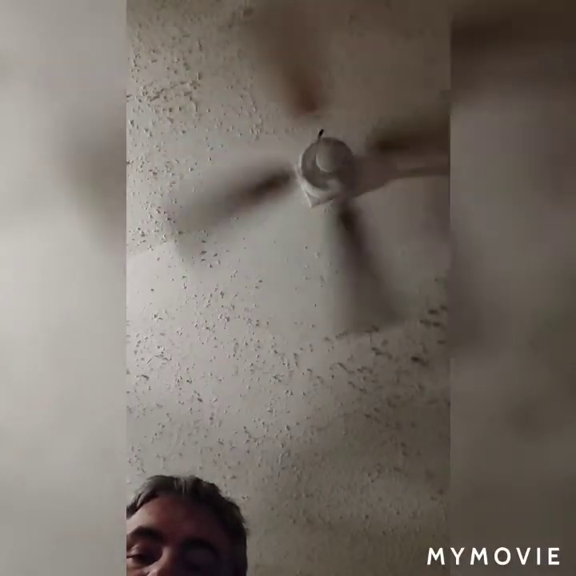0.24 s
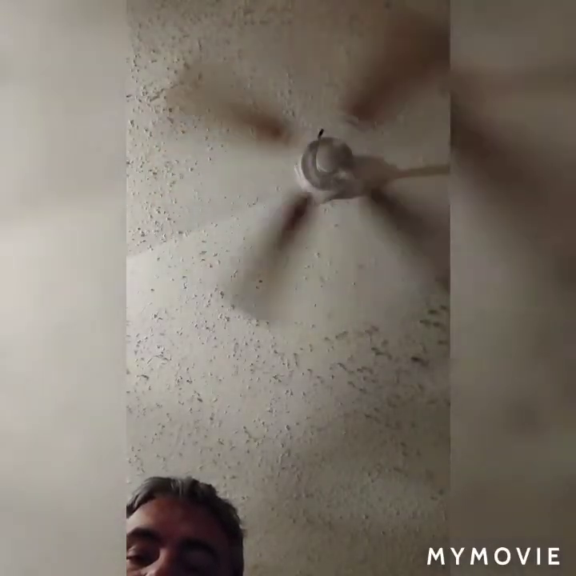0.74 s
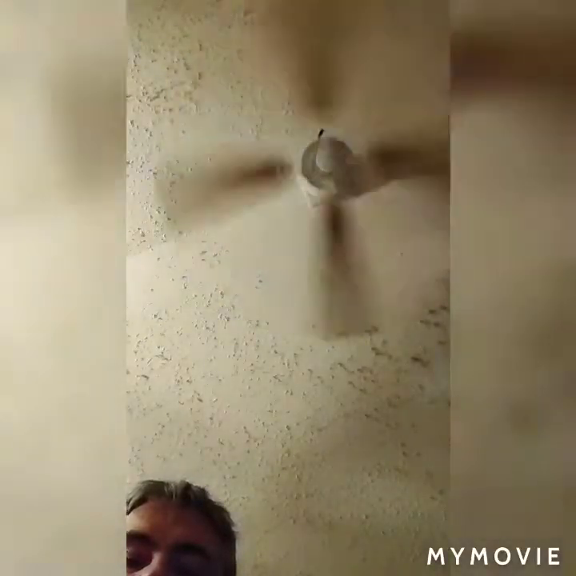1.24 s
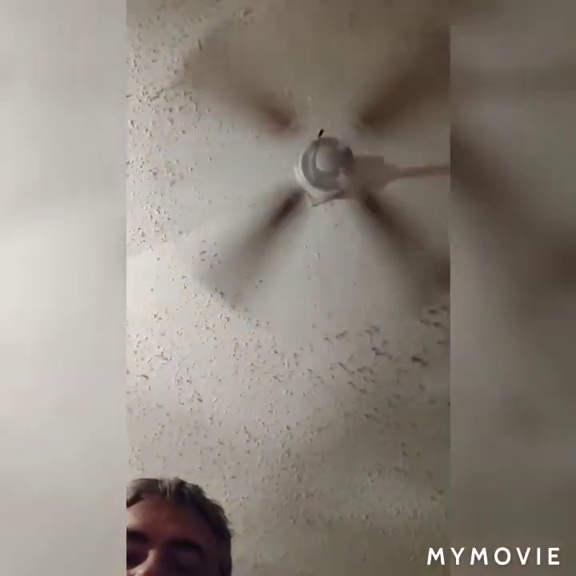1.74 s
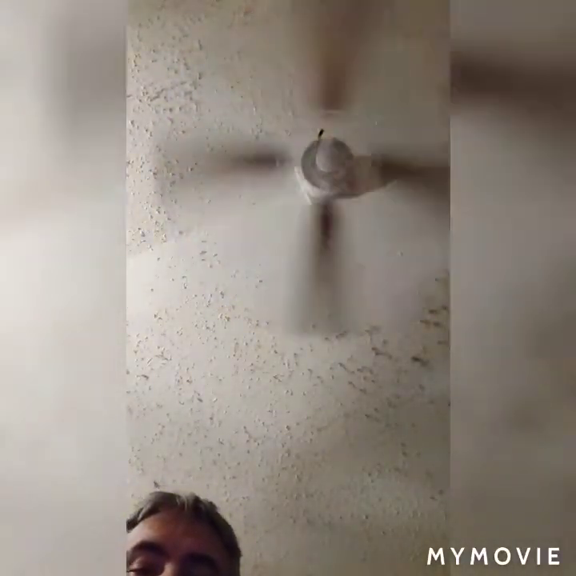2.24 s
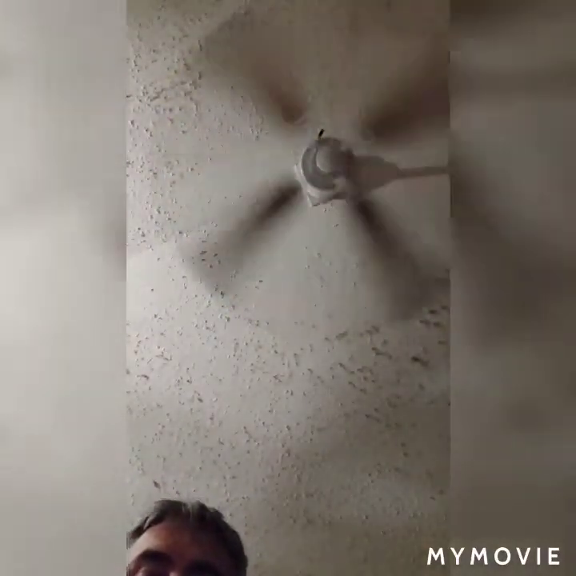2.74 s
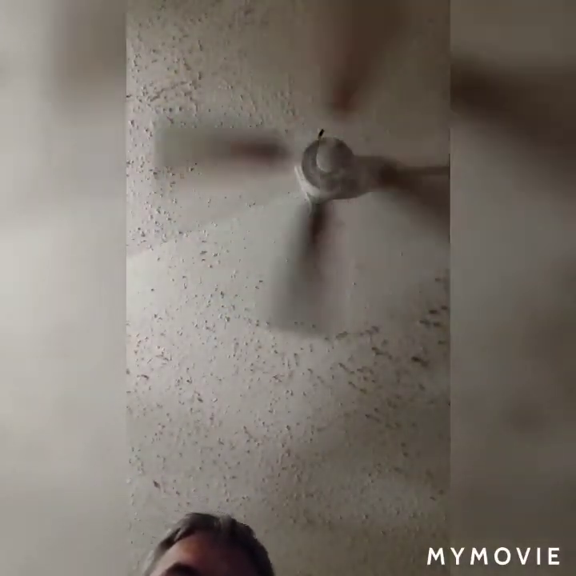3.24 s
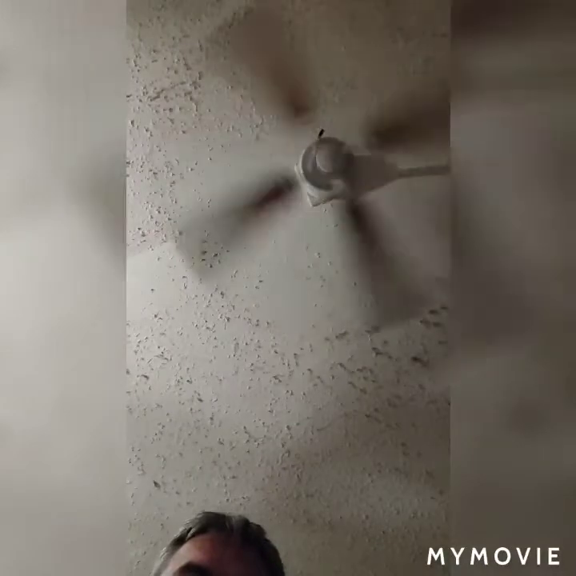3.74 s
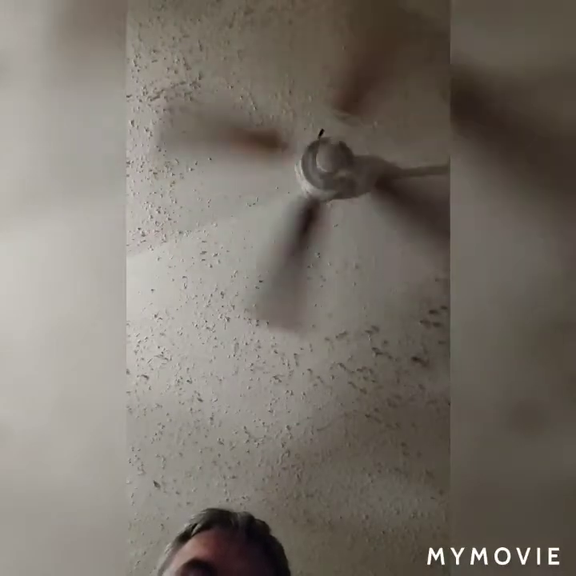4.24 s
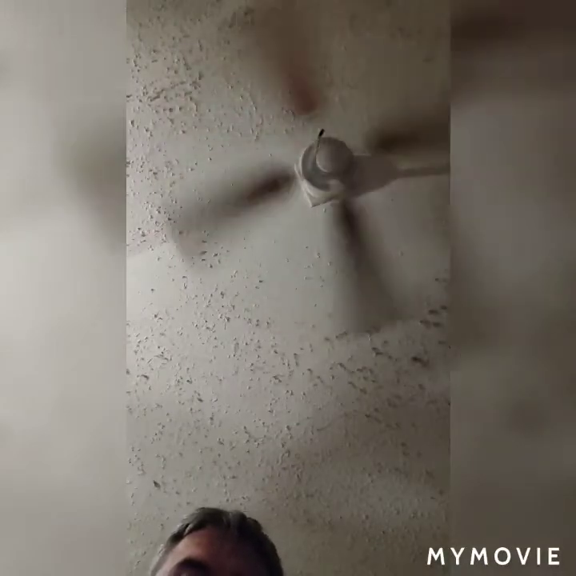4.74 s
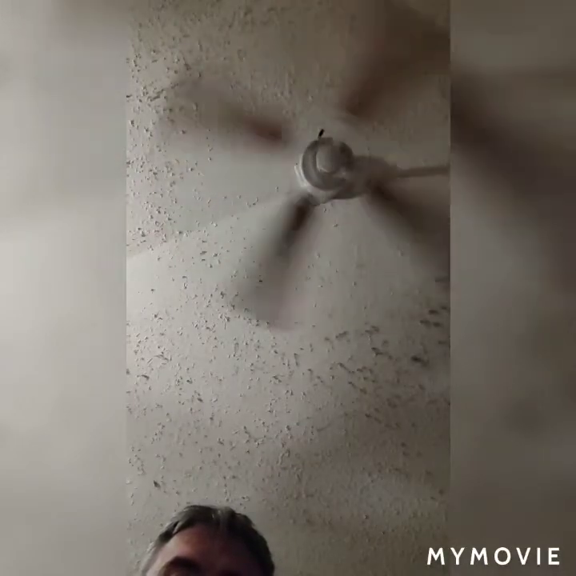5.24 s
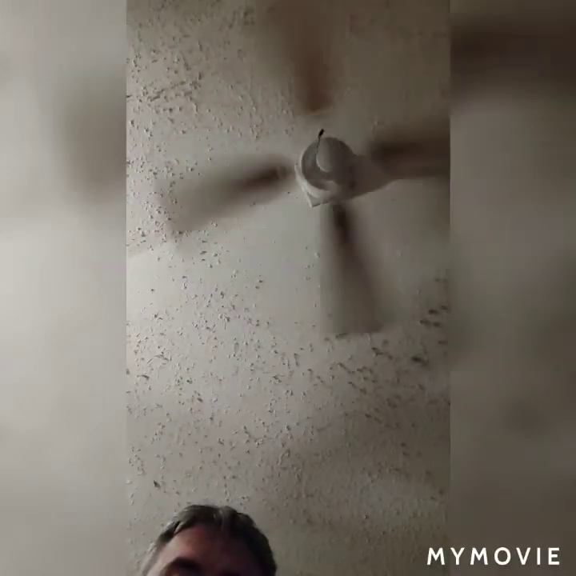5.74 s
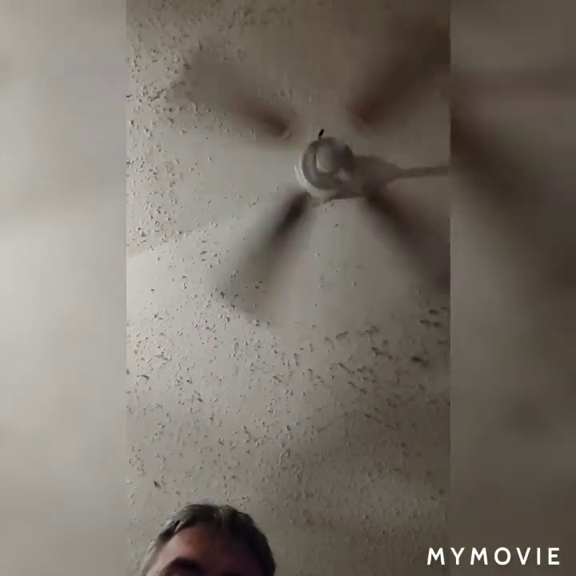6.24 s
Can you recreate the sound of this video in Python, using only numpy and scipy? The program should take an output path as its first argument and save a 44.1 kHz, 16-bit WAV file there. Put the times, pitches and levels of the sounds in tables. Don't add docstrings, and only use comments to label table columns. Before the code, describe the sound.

Stiff plastic packaging crackles and crunches irregularly very close by, with a few dull table bumps, over a faint fan in a small room.

```python
import sys
import numpy as np
from scipy import signal
from scipy.fft import rfft, irfft
from scipy.io import wavfile
from scipy.ndimage import uniform_filter1d

SR = 44100
rng = np.random.default_rng(int(sys.argv[2]) if len(sys.argv) > 2 else 0)


def waveform_to_disk(signal):
    frames = np.transpose(np.atleast_2d(signal))
    scaled = np.clip(frames, -1, 1) * 32767
    samples = np.round(scaled).astype(np.int16)
    wavfile.write(sys.argv[1], SR, samples)


def boost(x):
    u = np.asarray(x, float) / 20
    return 10 ** u


N = 285768

# (frequency [Hz], density [dB per Hz])
FAN_SPECTRUM = [(30, 14), (70, 2), (130, 2), (260, 0), (420, -14), (4100, -23), (5600, -33), (16000, -36)]
# (frequency [Hz], t60 [s])
ROOM_T60 = [(150, 0.093), (13000, 0.1)]
# (frequency [Hz], gain [dB])
MIC_RESPONSE = [(45, -35.5), (110, -21), (1050, -1.5), (1400, -1.5), (2200, -5.5), (2650, 1.5),
                (3300, -1.5), (4100, 3), (5100, -1.5), (8100, 2.5), (8800, -1), (9600, 2.5), (11900, 3),
                (13300, -15), (15900, -6), (16700, -54)]
# (frequency [Hz], gain [dB])
SOFT_TOP_RESPONSE = [(11000, 0), (12800, -10), (16000, -19)]
# (time [s], peak [dB], pitch [Hz], t60 [s])
TABLE_BUMPS = [(0.959, -19.5, 235, 0.052), (1.524, -25.5, 169, 0.092), (1.551, -25, 173, 0.053),
               (1.997, -2.5, 171, 0.065), (2.01, -15.5, 381, 0.032), (2.163, -18, 310, 0.15),
               (2.186, -14.5, 290.6, 0.2), (2.197, -22.5, 185, 0.21), (3.451, -17, 195, 0.02),
               (5.511, -33, 299, 0.15), (5.658, -10.5, 179, 0.012), (6.252, -17, 186, 0.015)]
# (time [s], length [s], level [dB], pitch [Hz])
HUMMING_HOLLOWS = [(0.053, 0.012, -51.5, 4170), (0.383, 0.034, -59, 2750), (.655, .12, -55, 1530),
                   (1.007, 0.066, -55.5, 1500), (2.17, 0.064, -57.5, 3630), (1.966, .03, -67, 4000),
                   (2.17, 0.097, -62, 4550), (2.178, 0.074, -52, 2510), (3.207, 0.054, -48, 960),
                   (3.464, 0.031, -48, 6240), (3.74, 0.057, -51, 920), (3.973, 0.021, -51, 980),
                   (4.232, 0.044, -55, 1070), (5.048, 0.012, -51, 1080), (5.342, .17, -46, 854),
                   (6.109, 0.088, -57, 1450), (6.257, 0.046, -54, 2570), (6.257, 0.025, -53.5, 4200)]
# (time [s], peak [dB], pitch [Hz])
RINGING_PANELS = [(0.55, -20, 1550), (0.638, -25.5, 2550), (1.06, -27.5, 1360), (1.436, -51, 3700),
                  (1.656, -57, 2410), (0.277, -30, 1190), (2.014, -17, 2650), (2.1648, -19, 2510),
                  (2.172, -15, 4540), (2.22, -29, 1480), (2.546, -51, 3100), (3.18, -38.5, 1190),
                  (3.72, -35, 4220), (3.798, -40, 790), (3.982, -21.5, 1020), (4.241, -40, 1240),
                  (4.27, -30.5, 960), (5.51, -23, 750), (6.012, -26.5, 796), (6.08, -27, 1270),
                  (6.147, -19, 1470), (6.26, -30, 4100), (6.26, -44, 2650)]
# (frequency [Hz], density [dB per Hz])
RUSTLE_SPECTRUM = [(150, 26), (400, 14.5), (1000, 9), (2600, 2), (5000, -11.5), (12000, -28)]
# (time [s], rustle [dB], brightness [dB per octave])
GRIP_STIR = [(0.001, -67, 9.5), (.42, -59.5, 7), (.55, -73, 6.5), (0.681, -54.5, -8.5), (.83, -78.5, -12),
             (1.07, -61.5, 6.5), (1.3, -67, 2.5), (1.55, -78.5, -13), (1.8, -60.5, 2), (1.9, -74, 4.5),
             (2.278, -63.5, -8), (2.52, -75, -6.5), (2.85, -69, 2), (3.1, -64, 12.5), (4.1, -54.5, 6),
             (4.38, -68.5, 2), (5.3, -59.5, 13.5), (6.478, -63, 6.5)]
# (time [s], hold [s], rustle [dB], brightness [dB per octave])
FILM_SQUEEZES = [(0.208, 0.055, -52.5, 4.5), (0.356, 0.0042, -44.5, 3.5), (0.702, 0.013, -41.5, 3.5),
                 (0.892, 0.079, -40, 5.5), (1.289, 0.031, -52.5, 5), (1.691, 0.008, -43.5, 5),
                 (2, 0.014, -43, 2.5), (2.172, 0.042, -37.5, 0.5), (2.59, 0.12, -55.5, 6.5),
                 (2.928, 0.22, -53, 6.5), (3.216, 0.015, -45.5, 4.5), (3.383, 0.091, -51.5, 8),
                 (3.762, 0.1, -47.5, 8), (3.972, 0.022, -43.5, 6), (4.262, 0.038, -53, 6.5),
                 (4.427, 0.033, -49.5, 9.5), (4.553, 0.057, -48.5, 7.5), (4.672, 0.17, -48, 7),
                 (4.883, 0.14, -54.5, 4.5), (5.112, 0.18, -49, 8), (5.333, 0.14, -40.5, 6),
                 (5.478, 0.09, -46.5, 4.5), (5.652, 0.051, -45, 8), (5.993, 0.009, -46.5, 7.5),
                 (6.249, 0.018, -52, 8)]
# (time [s], 1.5-5 kHz level [dB], low part [dB relative], high part [dB relative])
SINGLE_CRACKS = [(0.0268, -18, -11.5, -11), (0.0511, -31.5, -7, 5), (0.132, -30.5, -9.5, -8),
                 (0.1654, -23, -8.5, -10), (0.2124, -15, -3.5, -1), (0.2762, -47, -7, -12),
                 (0.334, -17.5, -39, -9.5), (0.416, -28, -6.5, -38), (0.4473, -29.5, -5, -7),
                 (0.5466, -24.5, -10, -17), (0.6312, -25, -49, -14), (0.7172, -35.5, -33.5, -4.5),
                 (0.7828, -41, 9, -13), (1.0439, -29, -30, -1), (1.0567, -25, -32, -13),
                 (1.1423, -19, -5, -10), (1.3, -30, -30, -6.5), (1.3254, -47, -2, 4),
                 (1.3745, -34, -3.5, 3.5), (1.4354, -60, -27, 17.5), (1.5229, -32.5, -0.5, -24),
                 (1.6252, -72, 28, -10), (1.7891, -24.5, -5, -11), (1.8062, -30.5, -39.5, -9.5),
                 (2.066, -28.5, 2.5, -31), (2.0823, -41, 19, -38), (2.3713, -21.5, -33, -19.5),
                 (2.439, -35, -38, -17.5), (2.6497, -20.5, -42, -12), (2.724, -29, -11, -7.5),
                 (2.9602, -28, -38, -13), (3.0762, -20.5, -3.5, -2.5), (3.1006, -22, -30, -3.5),
                  (3.2578, -31.5, 5, -6), (3.3687, -25.5, 0, -6.5), (3.391, -19.5, -34, -6),
                  (3.449, -16.5, -8, -4.5), (3.561, -23, -10, -13), (3.5796, -24.5, -33, -12),
                  (3.6138, -31, -5.5, -11), (3.656, -16, -12.5, -11.5), (3.698, -28, 0, -1),
                  (3.7756, -28.5, -27, 1), (3.8169, -24.5, -3.5, 1), (3.8295, -44, -22, -6),
                  (3.8586, -34, -14, 7.5), (3.9348, -25, -5, 0.5), (3.993, -29.5, 5.5, 1),
                  (4.0711, -27.5, -5, -5), (4.089, -26.5, -27, -12.5), (4.219, -31, -7, -11.5),
                  (4.3135, -26, -5, -4.5), (4.4207, -46, -28, 7.5), (4.4438, -43, -27, 7),
                  (4.623, -23.5, -4.5, -24), (4.6426, -22.5, -13, -12.5), (4.6893, -28.5, 2, -1),
                  (4.7564, -32, -28, -6), (4.779, -17, -3.5, -8.5), (4.863, -28, -5.5, -3),
                 (4.8835, -25.5, -14, -7), (4.9384, -22.5, -25, -9), (4.9724, -27, -5.5, -7),
                  (5.0265, -32.5, -34, 4), (5.1176, -45, -6, 13), (5.1921, -22, -33, -10),
                  (5.302, -23, -19, -1), (5.3835, -20.5, -26, 2.5), (5.414, -28.5, 8, -23),
                  (5.478, -23, -10, -24), (5.554, -20, -8, -7), (5.656, -10, -6.5, -6.5),
                  (5.7473, -25.5, -2.5, -0.5), (5.7938, -44, -17, 8), (5.8087, -27.5, -7.5, -5.5),
                  (5.8734, -51.5, 11, 8), (5.9255, -47.5, 9.5, -1), (5.991, -18, -34, -14.5),
                  (6.0766, -21, -18, -14), (6.103, -36, -12, -15), (6.1467, -22.5, -1.5, -8.5),
                  (6.183, -34, -19, -27), (6.2142, -22.5, 0.5, -0.5), (6.3596, -24, -8, 1.5),
                  (6.3964, -30, -7, 0.5), (6.427, -37.5, 2, 5.5)]
FOLD_CRUNCHES = [(0.231, -59, -17, -9), (0.2529, -20.5, -1.5, -5.5), (0.3608, -19.5, 1, -6),
                 (0.653, -44.5, -34, 5.5), (0.6627, -27.5, -29, -28), (0.6964, -44, 10, -16),
                 (0.73, -25.5, -38, -18), (0.9006, -34, 3, 5), (0.919, -36, 1, -3), (0.95, -26, -5, 1),
                 (0.975, -28, -2.5, -8), (1.1161, -19, -8, -2.5), (1.2634, -15, -5.5, -6.5),
                 (1.651, -45, -14.5, -7.5), (1.6886, -20, -42, -12.5), (1.711, -20.5, -12, -10),
                 (2.0017, -25, 2, -14.5), (2.0121, -20.5, -0.5, -14.5), (2.1217, -28.5, 5.5, -15),
                 (2.1651, -6.5, -3, -12), (2.197, -25, -6, -32), (2.606, -32.5, -8.5, -29),
                 (2.6675, -21.5, -14, -15), (2.6881, -50, -25, -17), (2.7406, -28, -30, -17),
                 (2.92, -30.5, -32, -28), (2.9796, -19, -33, -17.5), (3.002, -25.5, -20, -6),
                    (3.036, -26, -32, -7), (3.2045, -36.5, -14, -1), (3.2253, -37, -16, -1),
                    (3.2975, -36.5, 8.5, 0), (3.347, -54.5, 24, -11), (3.4722, -24.5, -13, -15),
                    (3.741, -39.5, 6, 4), (3.7968, -22.5, 1.5, -6), (3.8828, -28.5, -8, 0.5),
                    (3.9738, -29.5, 2.5, 6.5), (4.032, -42, -26, -14), (4.175, -27.5, -32, -14),
                    (4.263, -26.5, -21, -5), (4.2852, -26.5, -12.5, -8.5), (4.451, -26.5, -43, -10),
                    (4.5768, -47, -37, 17), (4.6, -23.5, -19, -12), (4.667, -33.5, -11, 0),
                    (4.714, -27, -2, -9), (4.7308, -23.5, -6, -5), (4.811, -37, -15, 0.5),
                    (4.903, -22, -11, -10), (4.992, -25.5, -15, -5.5),
                 (5.104, -33.5, 1, 2), (5.1739, -29, -3.5, -3), (5.229, -26.5, -0.5, -6),
                    (5.2517, -25, -7, -6.5), (5.3308, -21.5, -4, -5), (5.3558, -17.5, -8, -8),
                    (5.451, -27, 4, -4), (5.4835, -25, -29, -2.5), (5.5046, -16.5, -1, -22),
                    (5.6135, -30.5, -6, -9), (5.702, -44, -20, -21), (6.0083, -24, 2, -14),
                    (6.2525, -15.5, -9, -10.5), (6.4414, -25.5, -9, -10.5)]
FURTHER_CRACKS = [
    (2.0972, -30, -3, -21),
    (3.2876, -35, -10, 1.5),
    (4.011, -33.5, -13, 5.5),
    (4.1565, -38.5, -8, 2.5),
    (6.3444, -56, -22, -1),
]
SMALL_SNICKS = [(0.2347, -33, -6, -3), (0.3722, -24, -23, -23), (0.4032, -48, 13, -10),
                (0.4336, -52, -9, 4), (0.7425, -45, 9, -2), (0.861, -46, 8, -31),
                (0.8797, -29, -13.0, -3.5), (0.9352, -27.5, 5, -4), (1.0382, -39.5, 6, 0),
                (1.1098, -26, -28, -3), (1.2655, -29, 3, -1.5), (1.3713, -49, -9, 7),
                (1.5551, -53, -16, -6), (2.1224, -34.0, -7, -8.5), (2.1807, -22.5, -7, -9),
                (2.3581, -39, -13, -43), (2.5992, -39.5, -5.5, -24), (2.6712, -31, -5, 3.5),
                (2.9034, -39.5, -14, -14), (2.9908, -40, -7, -18), (3.0833, -28, -26, -1),
                (3.0956, -24, -12, -9), (3.1079, -29, -0.5, -7), (3.1814, -41.5, 4, -8),
                (3.231, -30.5, -4, -4.5), (3.3787, -33, 0, -15), (3.456, -32, -25, 3),
                (3.688, -30, -4, -15), (3.7228, -32.5, -1, -8.0), (3.7355, -36.5, -6, 3),
                  (3.7859, -42, 16, -12), (3.81, -26.5, -17, -18), (3.8776, -36, -11, 0),
                  (4.1825, -28.5, -11, -4.5), (4.4296, -52, -13, 12), (4.449, -27.5, -12, -21),
                  (4.5158, -35, -11, -16), (4.5432, -37.5, -5, -4), (4.5812, -27.5, -25.0, -4),
                  (4.697, -28, -20, 1), (4.7218, -21, -3, -6), (4.7345, -19, -9, -22),
                  (4.7661, -22, -6, -6), (4.814, -24, -13, -7), (5.0174, -26, -9, -16),
                  (5.078, -51, 10, -14), (5.103, -19.5, -30, -7), (5.1141, -36.5, 8, -11),
                  (5.158, -36, -9, 2), (5.1855, -27, -13, -15), (5.208, -34, -22, 4), (5.265, -33, -13, -1),
                  (5.2833, -44.5, 14, -7), (5.34, -33, -13, -13), (5.3713, -16, -18, -9),
                  (5.3786, -20, -16, -16), (5.3848, -29, -2, -1), (5.417, -18.5, -10, -9.5),
                  (5.4566, -21, -9, -5.0), (5.4879, -17.5, -12, -10), (5.645, -34, -2, -8),
                  (5.668, -51, -12.0, 4)]
MORE_SNICKS = [(0.1064, -74, -4, 0), (0.484, -51, -21, 4.5), (1.1937, -53, 4, -3), (1.6038, -64, 0, -18),
               (1.7667, -36, -13, -31), (1.97, -58, -5, 0), (2.544, -65, -16, -25.5), (2.564, -58, 3, -21),
               (2.698, -33, -22, -22), (2.8486, -55, -11.5, -20), (3.159, -50, -8, -1),
               (3.2414, -36, 0, -4), (3.303, -32, -5, -14), (3.5358, -40, 1, -14), (4.0337, -29, -19, -15),
               (4.2378, -47, 10.5, -15), (5.0508, -37, -1, -11), (5.1374, -42, -12, -5),
               (5.5754, -41, 4, -4), (6.45, -32.5, -26, -21)]

ECHO_DELAY_S = .00375


def at_hz(points, hz):
    p = np.array(points, float)
    return np.interp(np.log(hz), np.log(p[:, 0]), p[:, 1])


def rms_one(x):
    return x / np.sqrt(np.mean(x ** 2) + 1e-20)


def coloured(x, points):
    hz = np.maximum(np.fft.rfftfreq(len(x), 1 / SR), 1)
    cepstrum = irfft(np.log(boost(at_hz(points, hz))), len(x))
    cepstrum[1:len(x) // 2] *= 2
    cepstrum[len(x) // 2 + 1:] = 0
    return irfft(rfft(x) * np.exp(rfft(cepstrum)), len(x))


def bandpass(x, low_hz, high_hz):
    sos = signal.butter(2, [low_hz, high_hz], "band", fs=SR, output="sos")
    return signal.sosfilt(sos, x)


def add(out, at_s, waves):
    at = np.round(np.asarray(at_s) * SR).astype(int)[:, None] + np.arange(waves.shape[1])
    inside = at < N
    np.add.at(out, at[inside], waves[inside])


def fan():
    level_db = -66.0
    return boost(level_db) * rms_one(coloured(rng.standard_normal(N), FAN_SPECTRUM))


def room(x):
    room_db, table_db, table_t60_s = -18, 8.5, 0.004
    start_s, rise_s = .005, .003
    t, tail = np.arange(SR // 2) / SR, 0
    edges_hz = 100 * 2 ** np.arange(0, 7.4, .5)
    for low_hz, high_hz in zip(edges_hz, edges_hz[1:]):
        band = bandpass(rng.standard_normal(len(t)), low_hz, high_hz)
        walls = boost(-60 * t / at_hz(ROOM_T60, np.sqrt(low_hz * high_hz)))
        table_top = boost(table_db - 60 * t / table_t60_s)
        tail = tail + band * (walls + table_top)
    tail = tail * np.clip((t - start_s) / rise_s, 0, 1)
    tail = tail / np.sqrt(np.sum(tail ** 2))
    return boost(room_db) * signal.fftconvolve(coloured(x, SOFT_TOP_RESPONSE), tail)[:N]


def bumps():
    spread_octaves, roll_s, rise_s = 0.8, 0.00983, .005
    s, peak_db, hz, t60_s = np.transpose(TABLE_BUMPS)[:, :, None, None]
    out, t = np.zeros(N), np.arange(SR // 4) / SR
    u = rng.random((len(TABLE_BUMPS), 7, 2))
    pitch_hz = hz * 2 ** (spread_octaves * (u[..., :1] - .5))
    age = np.maximum(t - roll_s * u[..., 1:] ** 2, 0)
    modes = np.sin(2 * np.pi * pitch_hz * age) * boost(-60 * age / np.clip(t60_s, .02, .17))
    rise = 1 - np.exp(-t / rise_s)
    add(out, s[:, 0, 0], boost(peak_db[:, 0] - 6) * rise * modes.sum(1))
    return out


def hollows():
    q, fade_db_per_s, flicker_db, rise_s, grain_chance = 5, 350, 4, .006, .08
    out, t = np.zeros(N), np.arange(SR // 3) / SR
    half = 1 + .5 / q
    for s, length_s, level_db, hz in HUMMING_HOLLOWS:
        grains = rng.standard_normal(len(t)) * (rng.random(len(t)) < grain_chance)
        knots = t[::350]
        flicker = np.interp(t, knots, rng.standard_normal(len(knots)))
        hum = rms_one(bandpass(grains, hz / half, hz * half))
        fade_db = fade_db_per_s * np.maximum(t - length_s, 0)
        shape = np.minimum(t / rise_s, 1) * boost(flicker_db * flicker - fade_db)
        add(out, [s], (boost(level_db) * shape * hum)[None])
    return out


def panels():
    t60_cycles, pitch_spread = 22, .06
    s, peak_db, hz = np.transpose(RINGING_PANELS)[:, :, None, None]
    out, t = np.zeros(N), np.arange(SR // 20) / SR
    pitch_hz = hz * (1 + pitch_spread * rng.standard_normal((len(RINGING_PANELS), 3, 1)))
    modes = np.sin(2 * np.pi * pitch_hz * t) * np.exp(-np.log(1000) * t * hz / t60_cycles)
    add(out, s[:, 0, 0], boost(peak_db[:, 0]) * modes.mean(axis=1))
    return out


def handling():
    tighten_db_per_s, slacken_db_per_s = 796, 269
    t = np.arange(0, N / SR + .002, .001)
    at_s, grip_db, grip_tilt_db = np.transpose(GRIP_STIR)
    s, hold_s, top_db, tilt_db = np.transpose(FILM_SQUEEZES)[:, :, None]
    before_db = tighten_db_per_s * np.maximum(s - t, 0)
    after_db = slacken_db_per_s * np.maximum(t - s - hold_s, 0)
    squeeze = boost(top_db - before_db - after_db) ** 2
    grip = boost(np.interp(t, at_s, grip_db)) ** 2
    total = squeeze.sum(0) + grip
    tilt = (squeeze * tilt_db).sum(0) + grip * np.interp(t, at_s, grip_tilt_db)
    return t, 10 * np.log10(total), tilt / total


def rustle():
    clicks_per_s, size_db, clump_db, patch_db, t60_cycles, resonances = 5000, 3.5, 3, 4.0, 6.5, 24
    s, level_db, tilt_db = handling()
    t, knots = np.arange(N) / SR, np.arange(0, 7, .006)
    clumps = np.interp(t, knots, rng.standard_normal(len(knots)))
    sizes_db = size_db * np.minimum(rng.exponential(1, N), 4) + clump_db * clumps
    sizes = boost(sizes_db) * rng.choice([-1, 1], N)
    clicks = sizes * (rng.random(N) < clicks_per_s / SR)
    dealt = rng.integers(0, resonances, N)
    lag, out, slow_knots = round(ECHO_DELAY_S * SR), 0, knots[::8]
    for k, hz in enumerate(np.geomspace(150, 15500, resonances)):
        r, w = boost(-60 * hz / (t60_cycles * SR)), 2 * np.pi * hz / SR
        both = (dealt == k) * clicks
        echo_dealt = (dealt + 3) % resonances == k
        both[lag:] += echo_dealt[:-lag] * clicks[:-lag]
        band = rms_one(signal.lfilter([1, 0, -1], [1, -2 * r * np.cos(w), r * r], both + 1e-18))
        patch = np.interp(t, slow_knots, rng.standard_normal(len(slow_knots)))
        bright_db = np.interp(t, s, tilt_db) * np.log2(max(hz, 700) / 3000)
        colour_db = at_hz(RUSTLE_SPECTRUM, hz) + bright_db + patch_db * patch
        out = out + band * boost(colour_db) * np.sqrt(hz)
    out = coloured(out, SOFT_TOP_RESPONSE)
    even = out / np.sqrt(uniform_filter1d(out ** 2, size=SR // 10))
    return boost(np.interp(t, s, level_db)) * even


def crease_kicks(run_ms, mid_db, kick_db, lead_s):
    creak_db, run_loss_db, creaks = -24, 4, 2
    kick_s = rng.random((len(run_ms), 7)) * np.clip(run_ms, .3, 26)[:, None] / 1000
    kick_s -= kick_s[:, creaks:].min(axis=1, keepdims=True)
    late = np.abs(kick_s) / np.abs(kick_s).max(axis=1, keepdims=True)
    kick_s *= np.sqrt(late)
    kick = boost(kick_db * rng.standard_normal(kick_s.shape) - run_loss_db * late)
    kick_s += lead_s
    kick_s[:, :creaks] = lead_s * rng.random((len(run_ms), creaks))
    kick[:, :creaks] *= boost(creak_db - np.maximum(mid_db + 20, 0))[:, None]
    return kick_s, kick


def break_front(g, hz, rate, direct, echo):
    front_db, damping_ratio = -6, 2
    t = np.arange(256).astype(np.float32) / np.float32(SR)
    sign = np.sign(g[..., :1] + g[:, :1, 1:])
    front = (sign * np.sin(2 * np.pi * hz * t) * np.exp(-damping_ratio * rate * t)).sum(1)
    run_energy = (direct ** 2 + echo ** 2).sum(1)
    return boost(front_db) * front * np.sqrt(run_energy / (front ** 2).sum(1) / 2)[:, None]


def snaps(cracks, crunches, kick_db):
    crack_ms, crunch_ms, run_spread_db, lead_s = 1.212, 12, 3.0, .007
    t60_cycles, least_t60_s, mode_spread_db, onset_cycles = 6, .006, 5.5, .6
    treble_ring, treble_spread = .8, .45
    direct_dull_db, echo_db = -4.5, 0.0
    s, mid_db, low_db, high_db = np.transpose(cracks + crunches)
    run_ms = np.repeat([crack_ms, crunch_ms], [len(cracks), len(crunches)])
    run_ms = run_ms * boost(run_spread_db * rng.standard_normal(len(s)))
    kick_s, kick = crease_kicks(run_ms, mid_db, kick_db, lead_s)
    out, t, count = np.zeros(N), np.arange(1792) / SR, 18
    lead = round(lead_s * SR)
    # (low edge Hz, high edge Hz, dB relative to mid)
    parts = ((105.0, 470, low_db - 10.0), (402, 1578, low_db - 11.5), (1598, 4885, -14.5),
             (4930, 12530, high_db - 8.5), (11550, 15340, high_db - 15.0))
    for low_hz, high_hz, rel_db in parts:
        u, g = rng.random((len(s), count)), rng.standard_normal((len(s), count, 2))
        hz = (low_hz * (high_hz / low_hz) ** ((np.arange(count) + u) / count))[..., None]
        owner = rng.permutation(count) % kick_s.shape[1]
        age = np.maximum(t - kick_s[:, owner, None], 0).astype(np.float32)
        treble = low_hz > 4000
        t60_s = least_t60_s * treble_ring ** treble + t60_cycles / hz
        spread_db = mode_spread_db * treble_spread ** treble
        rate = (np.log(1000) / t60_s).astype(np.float32)
        swing_up = -np.expm1(-age * (hz / onset_cycles).astype(np.float32))
        modes = np.sin((2 * np.pi * hz).astype(np.float32) * age) * np.exp(-rate * age) * swing_up
        direct, echo = (np.einsum("em,emt->et", kick[:, owner] * boost(spread_db * g[..., k]), modes)
                        for k in (0, 1))
        front = break_front(g, hz, rate, direct, echo)
        for path in direct, echo:
            path[:, lead:lead + front.shape[1]] += front
        direct, echo = boost(direct_dull_db * treble) * direct, boost(echo_db) * echo
        energy = ((direct ** 2 + echo ** 2).sum(1) / (.008 * SR))[:, None]
        gain = boost(mid_db + rel_db)[:, None] / np.sqrt(energy)
        add(out, s - lead_s, gain * direct)
        add(out, s - lead_s + ECHO_DELAY_S, gain * echo)
    return out


def scene():
    cracks = SINGLE_CRACKS + FURTHER_CRACKS
    crunches = FOLD_CRUNCHES
    small = SMALL_SNICKS + MORE_SNICKS + [(2.143, -39, 7.8, -12)]
    near = snaps(cracks, crunches, kick_db=5.1) + boost(5.0) * rustle()
    near = near + bumps() + panels()
    air = fan()
    near = near + snaps(small, [], kick_db=6.7) + hollows()
    return (near + room(near) + air)[None]


def top_cut(x):
    return signal.sosfilt(signal.butter(12, 16970, fs=SR, output="sos"), x)


def record(dry):
    rounded = 0.52 * np.tanh(dry[0] / 0.42)
    heard = coloured(rounded, MIC_RESPONSE)[None]
    return top_cut(heard)


dry = scene()
out = record(dry)
waveform_to_disk(out)
```